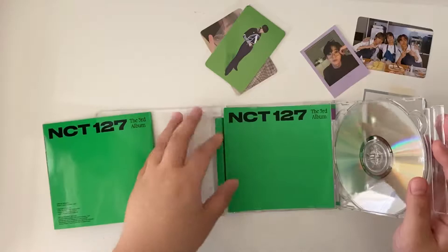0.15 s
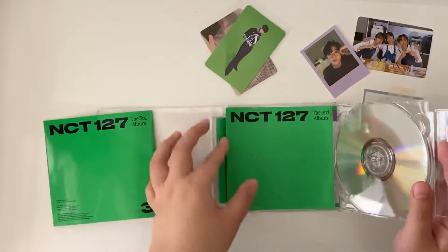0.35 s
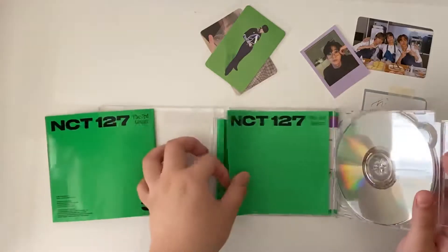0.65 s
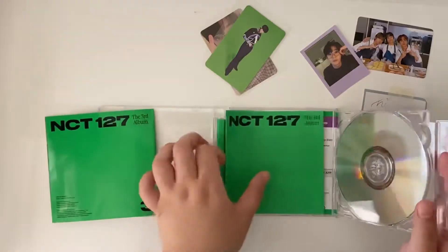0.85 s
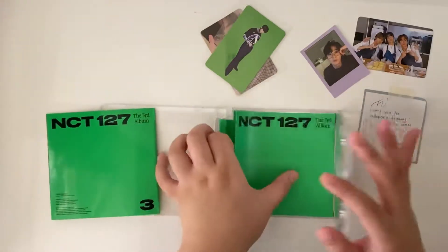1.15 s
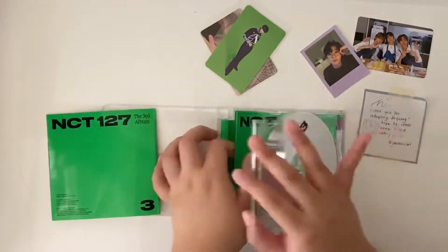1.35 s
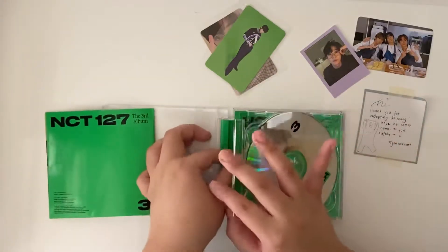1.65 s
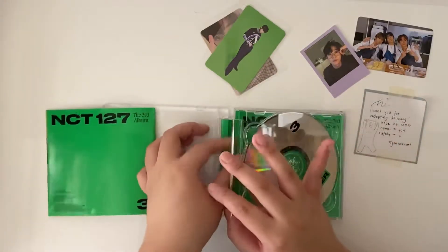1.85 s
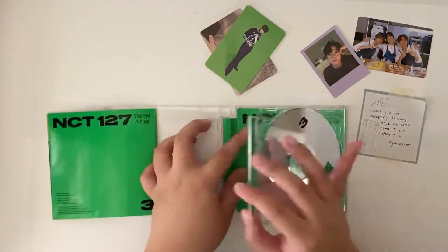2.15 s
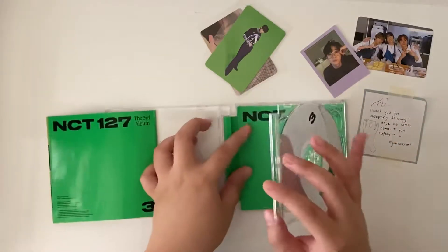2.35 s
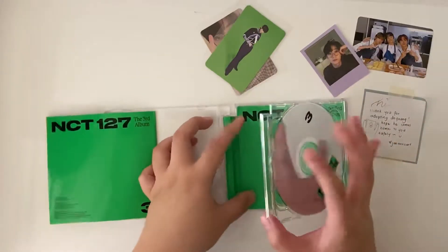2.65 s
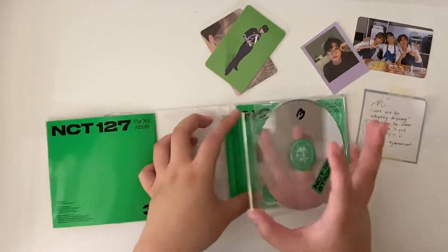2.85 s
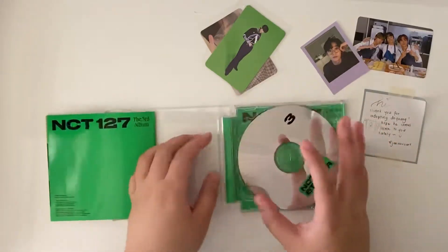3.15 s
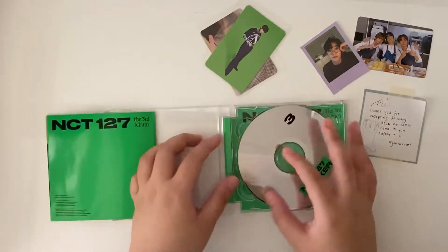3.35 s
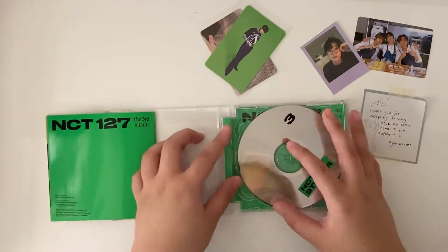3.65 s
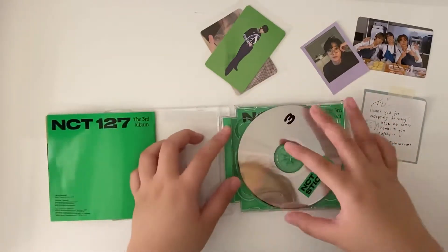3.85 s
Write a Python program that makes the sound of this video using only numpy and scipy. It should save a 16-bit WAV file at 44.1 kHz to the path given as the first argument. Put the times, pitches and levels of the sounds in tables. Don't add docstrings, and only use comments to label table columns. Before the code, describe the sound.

Plastic disc case clicking and rustling in hands on a table, its tray snapping shut twice.

```python
import sys
import numpy as np
from scipy import signal
from scipy.fft import rfft, irfft, next_fast_len
from scipy.io import wavfile
from scipy.ndimage import map_coordinates

SR = 44100
rng = np.random.default_rng(int(sys.argv[2]) if len(sys.argv) > 2 else 0)


def magnitude_from_level(level_db):
    exponent = np.asarray(level_db, float) / 20
    return 10 ** exponent


def wrap_up_sound(samples):
    columns = np.atleast_2d(samples).T
    tamed = np.clip(columns, -1, 1)
    steps = np.round(tamed * 32767).astype(np.int16)
    wavfile.write(sys.argv[1], SR, steps)


N = 176400


def unit(x):
    return x / np.sqrt(np.mean(x ** 2) + 1e-20)


def along(points, hz):
    f, v = np.transpose(points)
    return np.interp(np.log(hz + 1), np.log(f + 1), v)


def filtered(x, response):
    n = x.shape[-1]
    m = next_fast_len(n + 4096)
    return irfft(rfft(x, m) * response(np.fft.rfftfreq(m, 1 / SR)), m)[..., :n]


def noise(count, response):
    return unit(filtered(rng.standard_normal(count), response))


def coloured(count, curve_db):
    return noise(count, lambda f: magnitude_from_level(along(curve_db, f)))


def wobble(rate):
    knots = rng.standard_normal(int(N * rate / SR) + 4)
    return map_coordinates(knots, [np.arange(N) * rate / SR])


def peak(hz, centre_hz, width_hz):
    return np.abs(hz * width_hz / (centre_hz ** 2 - hz ** 2 + 1j * hz * width_hz))


def add(track, s, sound):
    part = track[round(s * SR):][:len(sound)]
    part += sound[:len(part)]


def ring(modes, t):
    total = 0
    for hz, db, t60 in modes:
        level = magnitude_from_level(db + rng.normal(0, 2.7) - 60 * t / t60)
        total = total + level * np.sin(2 * np.pi * (hz * t + 0.23 * rng.random()))
    return total


# start_s, peak_db, build_s, boom_db, mid_db
SNAPS = [
    (2.96, -34, 0.0034, -21.5, 0),
    (2.994, -10, 0.012, -2, -8),
    (3.533, -30, 0.0076, -14.5, 4.5),
    (3.571, -25, .004, -2, 4.5),
    (3.602, -10.5, 0.00878, -5, 1.5),
]
# pitch_hz, level_db
CRACK = [(300, -28), (1500, -17.5), (3000, -6.5), (4200, -6), (6000, -0.5), (9000, 0), (12000, -10.5),
         (16000, -15)]
# pitch_hz, level_db
MIDDLE = [(200, -30.5), (500, -2), (1000, -4.5), (1700, -6), (2600, -5), (4000, -31.5)]
# pitch_hz, level_db, t60_s
SHELL = [(650, -9, 0.088), (1020, 1, 0.02), (1357, 1, 0.077), (1750, -7.5, 0.038), (2070, -6, 0.08),
         (2620, -0.5, .05), (8300, 5, .03)]
# pitch_hz, level_db, t60_s
DISC = [(2570, -6, .06), (5320, -3, 0.042), (5840, 7, 0.049), (6260, -1, 0.035), (6600, -9, .06),
        (7950, -14.5, .04)]
# pitch_hz, level_db, t60_s
BOOM = [(104, -21.5, 0.061), (188, -13, 0.095), (252.7, -9, 0.079), (293.4, -15, 0.073), (354.4, -4, 0.043),
        (420, -6.5, 0.066), (635, -20, 0.055)]


def snaps():
    out, t = np.zeros(N), np.arange(8192) / SR
    lid_hz = 288.8 * (1 + 0.55 * np.exp(-t / 0.0078))
    sag = np.sin(2 * np.pi * np.cumsum(lid_hz) / SR)
    for s, db, build, boom_db, mid_db in SNAPS:
        pressed = np.clip(t / build, 0, 1)
        rise = pressed ** 2.0
        volley = pressed ** 0.63 * magnitude_from_level(-60 * np.maximum(t - build, 0) / 0.045)
        spiky = magnitude_from_level(3.12 * rng.standard_normal(256).repeat(32))
        crack = coloured(len(t), CRACK) + magnitude_from_level(mid_db - 11.0) * coloured(len(t), MIDDLE)

        swell = np.sin(np.pi * np.clip(t / (0.0097 + 1.3 * build), 0, 1)) ** 0.58
        thump = magnitude_from_level(boom_db + 3) * swell * sag
        shell = magnitude_from_level(mid_db - 11.5) * ring(SHELL, t)
        add(out, s, magnitude_from_level(db - 10.5) * rise * (thump + shell))

        disc = magnitude_from_level(-7.0) * ring(DISC, t)
        boom = magnitude_from_level(boom_db + 6.5) * ring(BOOM, np.abs(t - 0.366 * build))
        add(out, s, magnitude_from_level(db - 9) * (volley * spiky * crack + rise * (disc + boom)))
    return out


# start_s, length_s, level_db, centre_hz, drag_db
STROKES = [(0, 0.037, -67.5, 4000, -5), (0.1, 0.27, -69.5, 4400, -1.5), (0.268, 0.22, -59.5, 3940, -11.5),
           (0.33, 0.27, -67, 4400, -21), (0.43, 0.15, -56, 5250, -15), (0.604, 0.25, -60.5, 4200, -8.5),
           (0.808, 0.15, -68, 5100, -4), (0.92, 0.13, -68.5, 6160, 4), (1.104, 0.14, -65.5, 5030, -8),
           (1.046, 0.038, -62, 6500, -14), (0.953, 0.047, -56.5, 6800, -7),
           (1.122, 0.043, -57.5, 7000, -10.5), (1.585, 0.13, -62, 5130, -4.5), (1.786, .15, -57, 5100, -5),
           (1.937, 0.11, -70.5, 5200, -2.5), (2.029, 0.15, -66, 5300, -3), (2.168, 0.091, -70, 5600, 3),
           (2.267, 0.21, -69.5, 4940, 2), (2.432, 0.12, -63.5, 5950, -4), (2.641, 0.12, -74.5, 3600, 4),
           (2.766, 0.18, -64, 4500, 1.5), (3.937, 0.15, -85.5, 5030, 3.5)]
# pitch_hz, width_hz, level_db
TRAY = [(2366, 430, 0.5), (3940, 410, -12), (5180, 390, 1.5), (6050, 550, -1.5), (7100, 100, -2),
        (8900, 2800, -8.5)]
# pitch_hz, level_db
SKIN = [(800, -27.5), (1700, -10.5), (2600, -12), (3300, -3), (5500, -12), (9000, -3), (11000, 1),
        (15500, -14.5)]
# pitch_hz, level_db
DRAG = [(90, -15.5), (160, -1.5), (320, 5.5), (700, -8), (1100, -16.5), (1600, -17.5), (2500, -30)]
# from_s, to_s (a row whose end lies before its start changes nothing)
STILL = [
    (2.1, 2.4),
    (2.8, 2.635),
    (.57, 0.37),
]


def strokes():
    t = np.arange(N) / SR

    def tray(f):
        body = sum(magnitude_from_level(db) * peak(f, centre, width) for centre, width, db in TRAY)
        return magnitude_from_level(along(SKIN, f)) * (0.43 + body)

    fidget = magnitude_from_level(-75.5 + 8.8 * wobble(6.6)) * np.clip((2.97 - t) / 0.057, 0, 1)
    out = fidget * noise(N, tray)
    for start, end in STILL:
        out = out * np.clip(np.maximum(start - t, t - end) / 0.0078, 0.1, 1)
    grain = magnitude_from_level(1.9 * wobble(400) + 1.7 * wobble(90) + 2.3 * wobble(39.86))
    for s, length, db, hz, drag_db in STROKES:
        u = t[:SR // 2] / length
        shape = np.sin(np.pi * np.clip(u, 0, 1) ** 0.59) ** 1.24
        hiss = noise(len(u), lambda f: tray(f) * (0.5 + peak(f, hz, 0.3 * hz) ** 2))
        drag = magnitude_from_level(drag_db) * coloured(len(u), DRAG)
        add(out, s, magnitude_from_level(db) * shape * (hiss + drag))
    return out * grain


# full_s, hold_s, level_db, rise_db_per_s, fall_db_per_s
SWINGS = [
    (1.285, 0.073, -41, 202, 142),
    (3.339, 0.24, -61.5, 200.5, 55.5),
]
# pitch_hz, width_hz, level_db
SWUNG = [
    [(310, 250, 0.5), (753, 410, -4), (2600, 920, -6.5), (4500, 430, -4.5), (5350, 880, 0.5),
     (6180, 540, -3), (6800, 760, -3.5), (7830, 510, -5), (8500, 700, -10.5), (12000, 5700, -12.5)],
    [(400, 340, -5.5), (1700, 600, -14), (2580, 560, -6), (4080, 600, -6), (5130, 500, -3), (6350, 450, -2),
     (6800, 350, -2), (7600, 500, -13), (8600, 560, -11), (13500, 3000, -26.5)],
]


def swings():
    out, t = np.zeros(N), np.arange(N) / SR
    for (s, hold, db, rise, fall), body in zip(SWINGS, SWUNG):
        level = db - rise * np.maximum(s - t, 0) - fall * np.maximum(t - s - hold, 0)
        level = level - 25 * np.clip(t - s, 0, hold)

        def response(f):
            return np.sqrt(0.00355 + sum((magnitude_from_level(g) * peak(f, c, w) ** 1.5) ** 2 for c, w, g in body))

        flutter = 1.1 * wobble(74) + 0.77 * wobble(400)
        out += magnitude_from_level(level + flutter) * noise(N, response) * (t < 3.6)
    return out


# start_s, peak_db, pitch_hz
TICKS = [(0.0608, -43, 7100), (0.0766, -50, 7100), (0.4692, -55, 4860), (0.612, -39.5, 3360),
         (0.6548, -42, 3600), (0.701, -62, 3270), (0.7355, -50.5, 3730), (0.8041, -37, 5900),
         (0.9118, -34, 2160), (0.9709, -45, 6840), (1.0865, -39, 2310), (1.1354, -44.5, 7550),
         (1.275, -31, 5340), (1.3116, -45, 5400), (1.601, -48, 3780), (1.8028, -50.5, 5040),
         (1.8968, -45.5, 5000), (2.0693, -49.5, 6260), (2.093, -47.5, 4770), (2.1795, -53, 5700),
         (2.2744, -47.5, 4860), (2.288, -51, 7000), (2.3126, -57, 7000), (2.3527, -46, 6970),
         (2.382, -43, 4670), (2.4405, -49.5, 6550), (2.675, -46.5, 2580), (2.7, -51.5, 7100),
         (2.7743, -37.5, 3170), (2.805, -49, 3250)]
# start_s, peak_db, t60_s
CLICKS = [
    (1.088, -37, 0.0075),
    (1.6, -52, .008),
    (0.092, -50.5, 0.016),
    (1.786, -66, 0.017),
]


def ticks():
    out, t = np.zeros(N), np.arange(4096) / SR
    for s, db, hz in TICKS:

        def response(f):
            colour = magnitude_from_level(along(CRACK, f) * 0.2) * (0.27 + peak(f, hz, 0.1 * hz))
            return colour / (1 + (f / 11000) ** 4)

        decay = magnitude_from_level(db - 3.5 - 60 * t / 0.029)
        add(out, s, decay * (1 - np.exp(-t / 0.0015)) * noise(len(t), response))
    for s, db, t60 in CLICKS:
        add(out, s, magnitude_from_level(db - 60 * t / t60) * noise(len(t), lambda f: f / (f + 2500)))
    return out


# start_s, peak_db, pitch_hz
KNOCKS = [
    (0.804, -52.5, 345),
    (0.913, -54, 240),
    (0.989, -38, 355),
    (1.276, -35.5, 316),
    (2.209, -49.5, 219),
    (2.794, -33, 278),
    (2.811, -40.5, 284),
    (2.83, -41, 289),
]
# start_s, peak_db, pitch_hz
TAPS = [(0.313, -53, 1026), (0.988, -46.5, 1017), (1.089, -64, 940), (1.613, -56.5, 1014),
        (2.385, -65, 1332), (2.825, -57, 940), (.805, -54.5, 913), (.806, -54, 1915), (.912, -56.5, 905),
        (2.796, -47.5, 623), (2.849, -46.5, 302), (3.036, -30.5, 290)]


def knocks():
    out, t = np.zeros(N), np.arange(4096) / SR
    t60 = 0.042
    for s, db, hz in KNOCKS + TAPS:
        thud = ring([(hz, 0, t60), (hz * 1.2, -6, t60 * 0.7), (hz * 0.551, -6, t60)], t)
        thud = thud + 0.15 * magnitude_from_level(-60 * t / (0.89 * t60)) * coloured(len(t), MIDDLE)
        add(out, s, magnitude_from_level(db + 3.0) * (1 - np.exp(-t / 0.0013)) * thud)
    return out


# pitch_hz, t60_s
WALLS = [(150, 0.3), (400, 0.27), (1500, 0.32), (5000, 0.3), (14000, 0.31)]


def walls(x):
    hz, t, z = signal.stft(rng.standard_normal((2, SR // 2)), SR, nperseg=256)
    decay = magnitude_from_level(-60 * t / along(WALLS, hz)[:, None])
    tail = signal.istft(z * decay, SR, nperseg=256)[1]
    late = np.pad(x, (300, 0))[None]
    return signal.fftconvolve(late, tail / np.linalg.norm(tail[0]), axes=1)[:, :N]


# pitch_hz, level_db
AIR = [(53, -39.5), (90, -2.5), (231, -8), (286, -15), (340, -16), (463, -31.5), (1210, -43), (1390, -40),
       (9000, -56.5), (11700, -103.5), (19800, -120)]
# time_s, level_db
HUM = [
    (0.0, -49.5),
    (3.56, -57.5),
    (3.641, -44),
    (3.7, -58),
    (4.0, -54.5),
]


def room_tone():
    air = [coloured(N, AIR) * magnitude_from_level(3.0 * wobble(8)) for _ in range(2)]
    s, db = np.transpose(HUM)
    hum_hz, wander_hz = 65.2, 7.1
    line = np.sqrt(2) * np.sin(2 * np.pi * np.cumsum(hum_hz + wander_hz * wobble(9)) / SR)
    fuzz = magnitude_from_level(-6.5) * noise(N, lambda f: peak(f, hum_hz, 28) ** 2)
    hum_level = magnitude_from_level(np.interp(np.arange(N) / SR, s, db))
    return magnitude_from_level(-58) * np.array(air) + hum_level * (line + fuzz)


# pitch_hz, level_db
WALLS_COLOUR = [(150, 6), (300, -4.5), (600, -4), (1000, 0.5), (16000, -7)]


def scene():
    near = snaps() + strokes() + swings() + ticks() + knocks()
    scatter = rng.standard_normal(1024) * magnitude_from_level(-60 * np.arange(1024) / SR / 0.053)
    scattered = signal.fftconvolve(near, scatter / np.linalg.norm(scatter))[:N]
    echoes = walls(filtered(near, lambda f: magnitude_from_level(along(WALLS_COLOUR, f))))
    return np.array([near, scattered]) + magnitude_from_level(-8) * echoes + room_tone()


def band_limit(x):
    return signal.sosfilt(signal.butter(12, 16810, fs=SR, output="sos"), x)


# pitch_hz, likeness (0 to 1)
ALIKE = [(120, 1), (350, .985), (600, .7), (1200, .4), (2700, .97), (5000, .98), (8500, .8), (9600, 1),
         (11000, 1), (12400, .65), (13700, 1)]
# pitch_hz, lead_rad
LEAD = [(0, 0), (600, -.4), (1100, 0), (5000, 0), (5900, .6), (6900, .1), (8200, 1.1), (9000, 2.5),
        (9450, np.pi), (10800, np.pi), (11400, 3.6), (13600, 2 * np.pi)]
# pitch_hz, level_db
LEAN = [(100, 0), (350, -2), (520, -5), (690, -7), (1030, -7), (1400, -6), (2100, -1), (2800, 0)]


def record(dry):
    def share(f):
        turn = np.arccos(np.clip(along(ALIKE, f), 0, 1)) / 2
        return np.array([np.cos(turn), np.sin(turn)])

    mid, side = filtered(dry, share)
    lead_hz, lead = np.transpose(LEAD)

    def port(f):
        top = np.clip((16100 - f) / 400, 0, 1)
        low_cut = f ** 4 / (f ** 4 + 48 ** 4)
        both = []
        for sign in (1, -1):
            level = magnitude_from_level(sign * along(LEAN, f) / 2)
            phase = np.exp(0.5j * sign * np.interp(f, lead_hz, lead))
            both.append(top * low_cut * level * phase)
        return np.array(both)

    mix = filtered(np.array([mid + side, mid - side]), port)
    return band_limit(mix)


dry = scene()
out = record(dry)
wrap_up_sound(out)
```